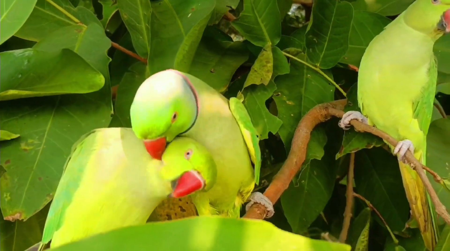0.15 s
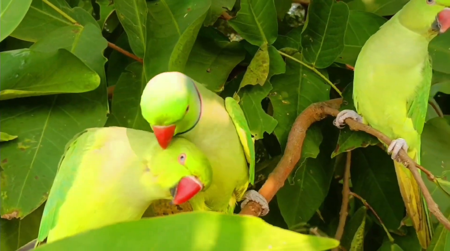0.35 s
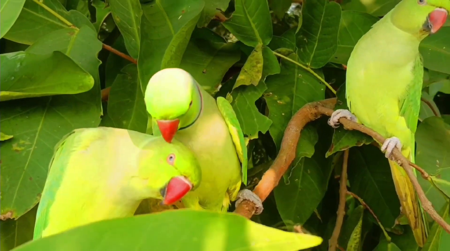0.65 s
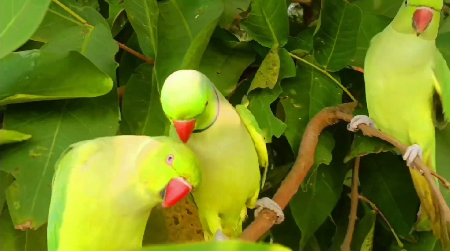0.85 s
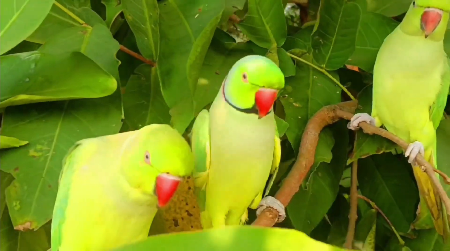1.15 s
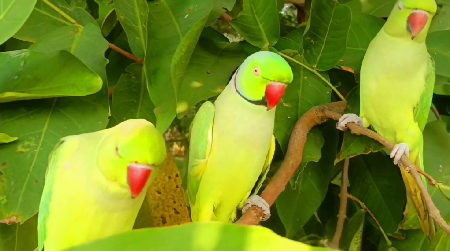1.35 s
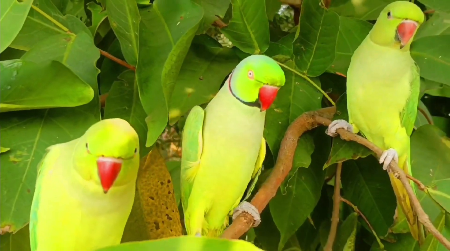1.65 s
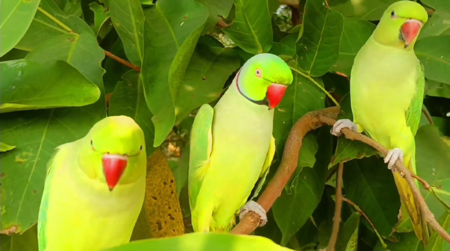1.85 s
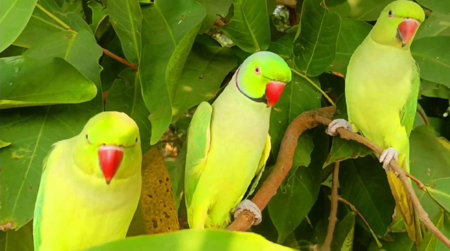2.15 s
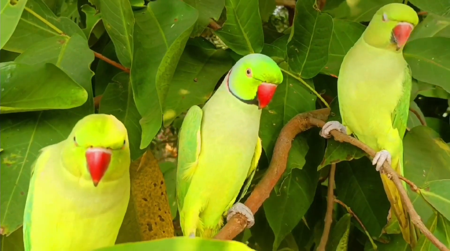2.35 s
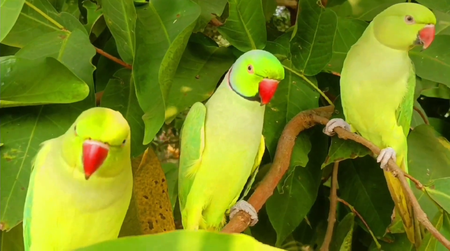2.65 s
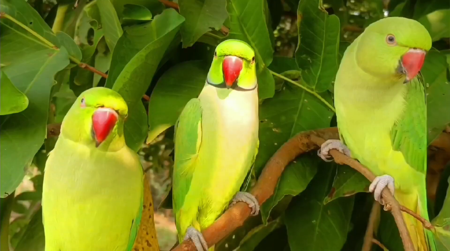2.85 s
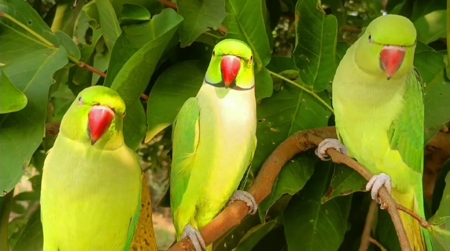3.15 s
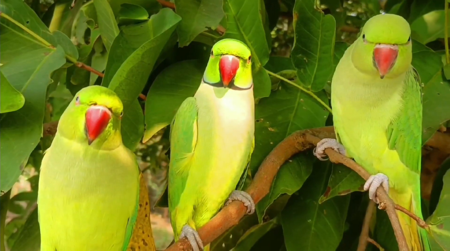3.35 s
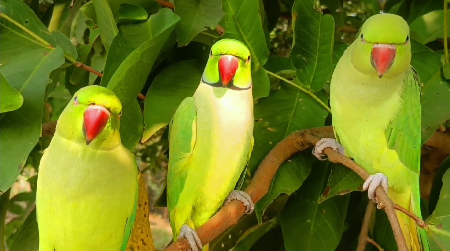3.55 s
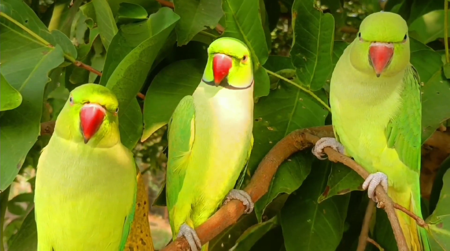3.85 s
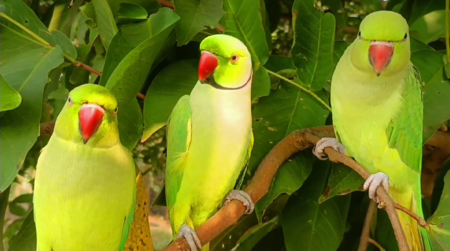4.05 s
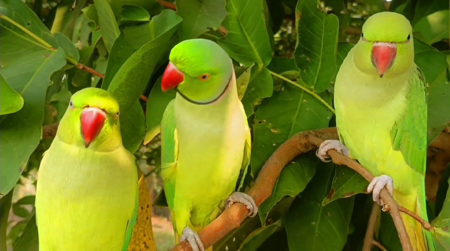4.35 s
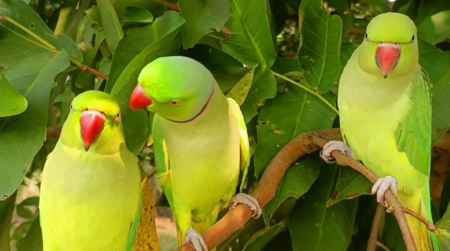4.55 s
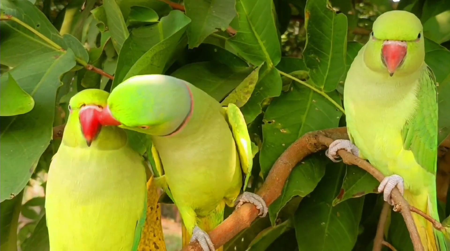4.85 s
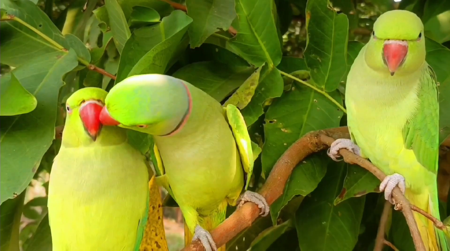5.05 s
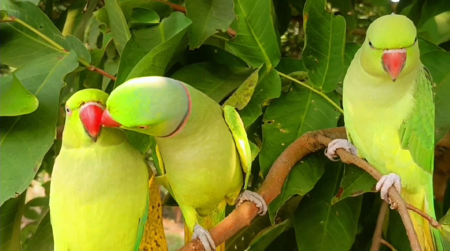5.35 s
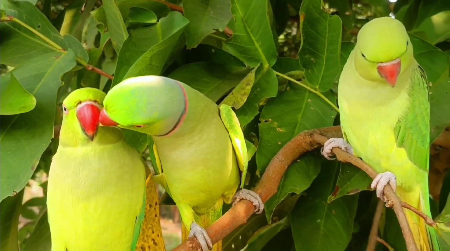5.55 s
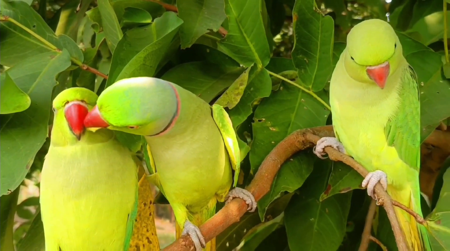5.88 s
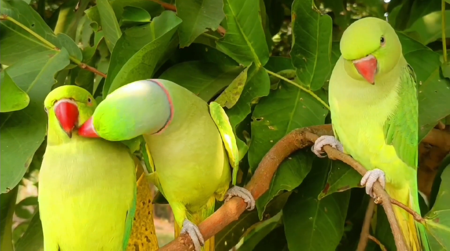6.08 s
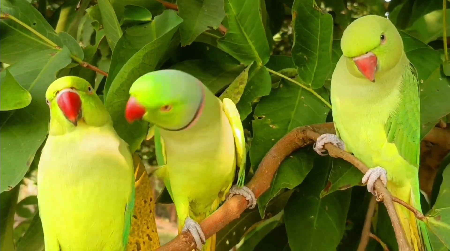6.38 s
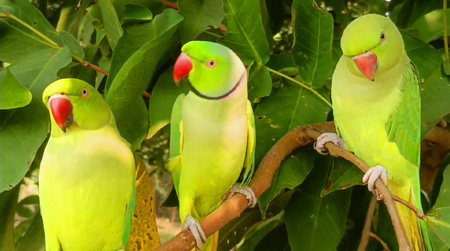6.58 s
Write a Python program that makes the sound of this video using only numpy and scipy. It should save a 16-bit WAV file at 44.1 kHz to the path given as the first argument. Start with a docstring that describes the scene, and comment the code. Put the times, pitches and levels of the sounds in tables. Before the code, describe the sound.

Outdoor foliage, parakeets near the microphone: one raw screech at the very start, small knocks and feather rustle, then a calmer stretch of distant whistled song and faint twitter. Low rumble and soft hiss swell back before a piercing whine strains upward, cracks and drops; after a brief gap and a sharp beak tick, another torn screech bursts out, then air and faint chatter remain.

```python
"""A leafy tree with parakeets: a harsh screech, a long nasal whine that rises, cracks and falls, a second screech.
Each screech is a harmonic down-sweep that breaks into a rasp by phase and amplitude modulation, as the syrinx flutters.
The whine sums a strong second harmonic, filtered overtones and a thin whistle of sum tones.
Feathers (grainy filtered noise) rustle and beaks (decaying noise bands) tick around the calls.
Small birds (gliding sines) sing far off over a low rumble of coloured noise."""
import sys
import numpy as np
from scipy import signal
from scipy.fft import rfft, irfft, next_fast_len
from scipy.io import wavfile
from scipy.ndimage import uniform_filter1d

SR = 44100
rng = np.random.default_rng(int(sys.argv[2]) if len(sys.argv) > 2 else 0)


def dump_mix(stems):
    """Bounce the given channels to the path in sys.argv[1] as a 16-bit WAV at rate SR."""
    frames = np.atleast_2d(stems).T  # one column per channel
    limited = np.clip(frames, -1, 1)  # hard clip at full scale
    pcm = np.round(limited * 32767).astype(np.int16)
    wavfile.write(sys.argv[1], SR, pcm)


N = 296352
TIME = np.arange(N) / SR
TOP_HZ = 15700  # upper limit of the harmonics and of the whole sound

# the voice cracks at the top of the whine: (time [s], length [s], pitch [Hz], level [dB])
CRACK = (5.055, .022, 2200, -16)
# resonances of the throat in a screech: (frequency [Hz], gain [dB])
SCREECH_THROAT = [(500, -19.5), (900, -5.5), (1400, -5), (2100, -3), (3200, -2), (4100, -1.5),
                  (4600, -18.5), (5000, -21.5), (5400, -3), (6100, -14.5), (6550, -4.5), (7600, -5),
                  (8600, -22), (15000, -27)]
# stretches of higher rumble and soft hiss: (start [s], end [s], rumble lift [dB], hiss level [dB])
SWELLS = [(-.1, 1.304, 9, -64), (4.127, 6.8, 9, -61.5)]


def undb(db):
    """Amplitude ratio: decibels to gain."""
    return 10 ** (np.asarray(db) / 20)


def unit(x):
    """Normalisation: scale to rms 1."""
    return x / np.sqrt(np.mean(x ** 2) + 1e-18)


def steady(x, seconds):
    """Envelope division: hold the running rms at 1, leaving faster flutter in."""
    window = max(int(seconds * SR), 8)
    power = np.abs(uniform_filter1d(x ** 2, window))
    return x / np.sqrt(power + 1e-12)


def shape(x, gain):
    """Spectral multiplication: filter by a gain that is a function of frequency."""
    n = next_fast_len(x.shape[-1] + 4096)
    hz = np.maximum(np.arange(n // 2 + 1) * SR / n, 1)
    return irfft(rfft(x, n) * gain(hz), n)[..., :x.shape[-1]]


def colour(x, points):
    """Spectral envelope: filter by (frequency [Hz], gain [dB]) points on a log-frequency axis."""
    hz, db = np.transpose(points)
    return shape(x, lambda f: undb(np.interp(np.log(f), np.log(hz), db)))


def resonance(x, hz, width):
    """Simple resonator: two-pole band-pass, gain 1 at the centre."""
    b, a = signal.iirpeak(min(hz, .45 * SR), hz / width, fs=SR)
    return signal.lfilter(b, a, x)


def wobble(n, hz):
    """Random modulation: low-passed noise up to about hz, rms 1."""
    return unit(shape(rng.standard_normal(n), lambda f: 1 / (1 + (f / hz) ** 4)))


def step(t, at, seconds):
    """Sigmoid transition: smooth rise from 0 to 1 around a moment."""
    return (1 + np.tanh((t - at) / seconds)) / 2


def gate(t, start, end, rise, fall):
    """Amplitude envelope: smooth opening at start and closing at end."""
    return (1 + np.tanh((t - start) / rise)) * (1 + np.tanh((end - t) / fall)) / 4


def registers(x):
    """Band splitting: part a voice at the throat's notch into its body and its shrill edge."""
    body = shape(x, lambda f: 1 / (1 + (f / 4850) ** 40))
    return body, x - body


def span(start, end):
    """Sampled time: clock times from start to end."""
    return TIME[max(int(start * SR), 0):int(end * SR)]


def add(out, t, x):
    """Superposition: mix x into out at its clock times."""
    i = int(round(t[0] * SR))
    out[i:i + len(x)] += x


def background(rumble_hz=230, side_db=-14):
    """Coloured noise: outdoor air with a restless rumble, widened by noise of opposite sign in the two channels."""
    # spectrum of the background: (frequency [Hz], relative level [dB])
    air_spectrum = [(15, -51.5), (25, -31.5), (73, -2.5), (113, -0.5), (221, -12), (741, -16), (1240, -23),
                    (4500, -27), (7500, -36), (8350, -38.5), (9050, -63.5), (10900, -70.5), (11800, -46.5),
                    (13200, -29.5), (15500, -29.5)]
    # low drones in the rumble: (centre [Hz], width [Hz], level [dB])
    drones = [(95.8, 18, -60.5), (127.4, 25, -66.5), (166.4, 41, -67.5)]
    air_db = -55.5
    air, side = (unit(colour(rng.standard_normal(N), air_spectrum)) * undb(air_db) for _ in range(2))
    low = shape(air, lambda f: 1 / (1 + (f / rumble_hz) ** 4))
    drone = np.zeros(N)
    for hz, width, db in drones:
        narrow = resonance(resonance(rng.standard_normal(N), hz, width), hz, width)
        drone += undb(db) * unit(narrow)
    lift = sum(db * gate(TIME, start, end, 0.007, .01) for start, end, db, _ in SWELLS)
    swell = undb(lift + 0.33 * wobble(N, 4.4))
    rumble = (colour(low, [(35, -7), (70, -2.5), (250, 1.5)]) + drone) * swell
    side = undb(side_db) * colour(side, [(40, 6), (100, 0.5), (200, 3), (330, 14), (700, 9.5),
                                         (3000, 13.5), (8000, 9), (13000, 10)])
    return air - low + rumble + np.array([[1], [-1]]) * side


def feathers(grain_db=3):
    """Stick-slip friction: barbs slide in tiny uneven bursts, with a duller scrape. Apart from this, a soft
    hiss rises in two stretches."""
    # spectrum of the rustle, bright from 1 to 8 kHz, almost empty near 10 kHz:
    #   (frequency [Hz], relative level [dB])
    rustle_spectrum = [(530, -49.5), (900, -10), (1490, -11.5), (1700, -14.5), (1780, -15), (3650, -6),
                       (4960, -21.5), (5390, -13.5), (6580, -4), (7760, -4.5), (8630, -28.5), (8940, -50.5),
                       (10500, -80.5), (11400, -26.5), (15000, -28)]
    # rustles: (time [s], length [s], attack [s], level [dB], dull scrape level [dB])
    rustles = [(0.341, 0.091, 0.0037, -50, -48), (0.516, 0.13, 0.064, -44.5, -50),
               (1.228, .08, 0.052, -48.5, -74.5), (4.135, 0.079, 0.0028, -47, -80),
               (4.272, 0.057, 0.022, -48.5, -64), (5.272, 0.074, 0.0045, -55, -63),
               (6.078, 0.14, 0.028, -62, -66)]
    hiss_ramp_s, release_s = .004, 0.024
    scrape_hz, scrape_width_hz = 850, 450
    grains = rng.standard_normal(N) * undb(grain_db * wobble(N, 300))
    bright = unit(colour(grains, rustle_spectrum))
    dull = unit(resonance(resonance(grains, scrape_hz, scrape_width_hz), scrape_hz, scrape_width_hz))
    out = np.zeros(N)
    for start, end, _, db in SWELLS:
        out += bright * undb(db) * gate(TIME, start, end, hiss_ramp_s, hiss_ramp_s)
    for start, length, attack, db, scrape_db in rustles:
        envelope = gate(TIME, start, start + length, attack, release_s)
        out += envelope * (undb(db) * bright + undb(scrape_db) * dull)
    return out


def screech_gesture(u, length, breaks, shrill, level_db, open_hz, opening, rest_hz=2250):
    """Articulation: pitch, body and treble levels, roughness and beak resonance, u seconds into a screech."""
    # swoop down to a shelf, break into a low rasp, lift to a crest, droop while closing
    swoop_hz, shelf_hz, rasp_hz, crest_hz, droop_hz = 3200, 1990, 1018.5, 1359, 200.5
    swoop_share, break_s = .21, .01  # swoop time as a share of the clean part; time the break takes
    crest_s, crest_rise_s, crest_fall_s, close_s = .268, .07, 0.031, 0.051
    accent_db, accent_s, accent_edge_db = 5.5, .007, 4.5  # opening accent; its extra treble
    surge_db, sag_db_per_s, close_db = 2.5, 25.5, -15
    rough_clean, rough_rasp, rough_crest, tear_s = .16, .88, .38, .02
    edge_db, shrill_db, shrill_s = -16.5, 13.5, .035  # treble against the body; its late rise
    flare_hz, flare_width_hz, flare_db, flare_body_db = 6440, 190, 13.5, 1.5

    u = np.maximum(u, 0)
    broken = step(u, breaks, break_s)
    since = np.maximum(u - breaks, 0)
    crest = np.exp(-((u - crest_s) / np.where(u < crest_s, crest_rise_s, crest_fall_s)) ** 2)
    closing = np.clip(1 + (u - length) / close_s, 0, 1)
    high = shelf_hz + (swoop_hz - shelf_hz) * np.exp(-u / (swoop_share * breaks))
    low = rasp_hz + (crest_hz - rasp_hz) * crest - droop_hz * closing
    hz = high + (low - high) * broken
    # the rasp grows after the break and partly clears on the crest
    rough = rough_clean + (rough_rasp - rough_clean) * step(u, breaks + tear_s, tear_s)
    rough -= (rough_rasp - rough_crest) * crest ** 10
    accent = np.exp(-u / accent_s)
    db = level_db + accent_db * accent + surge_db * broken - sag_db_per_s * since + close_db * closing ** 2
    # the call flares as its third harmonic crosses a resonance
    crossing = np.exp(-((3 * hz - flare_hz) / flare_width_hz) ** 2)
    treble_db = db + edge_db + shrill_db * step(u, shrill, shrill_s)
    treble_db += flare_db * crossing + accent_edge_db * accent
    beak_hz = rest_hz + (open_hz - rest_hz) * np.minimum(since / opening, 1) * (1 - closing)
    return hz, db + flare_body_db * crossing, treble_db, np.clip(rough, 0, 1), beak_hz


def screech(start, length, breaks, shrill, level_db, open_hz, opening, beak_db, beak_width_hz, first_db,
            flutter_hz=200, throb=0.12, breath_db=-23, slope_db=-3, clean_db=-6):
    """Source and filter: a harmonic sweep whose flutter in phase and strength smears the upper harmonics."""
    # modulation at full roughness: (phase swing [rad], pitch stagger [share of pitch])
    swing, stagger = (1.25, .055)
    # narrow rings set off by a screech: (centre [Hz], width [Hz], gain [dB])
    rings = [(6270, 110, -1), (12576, 12, 9)]
    t = span(start - .02, start + length + 0.035)
    n = len(t)
    hz, db, edge_db, rough, beak_hz = screech_gesture(
        t - start, length, breaks, shrill, level_db, open_hz, opening)
    swooping = 1 - step(t, start + breaks, .01)
    # the syrinx flaps at an uneven rate far below its pitch, and the pitch itself staggers
    flap = 2 * np.pi * np.cumsum(flutter_hz * (1 + .25 * wobble(n, 50))) / SR
    phase = 2 * np.pi * np.cumsum(hz * (1 + stagger * rough * wobble(n, 60))) / SR
    phase += swing * rough * (.6 * np.sin(flap) + .3 * wobble(n, 260))
    voice = np.zeros(n)
    for k in np.arange(1, 15):
        lift = beak_db / (1 + ((k * hz - beak_hz) / beak_width_hz) ** 2)
        # the opening swoop holds little above the second harmonic; rough stretches lose some fundamental
        tilt = slope_db * np.log2(k) + clean_db * swooping * np.clip(k - 2, 0, 2)
        tilt += (k == 1) * first_db * rough
        # each harmonic tears in its own way
        torn = .5 * rough * (wobble(n, 110) * np.sin(k * phase) + wobble(n, 110) * np.cos(k * phase))
        voice += (k * hz < TOP_HZ) * undb(lift + tilt) * (np.sin(k * phase) + torn)
    voice += undb(breath_db) * (0.13 + rough) * 6 * rng.standard_normal(n)
    voice *= np.exp(throb * rough * np.cos(flap))
    body, edge = registers(colour(voice, SCREECH_THROAT))
    call = steady(body, .008) * undb(db) + steady(edge, .01) * undb(edge_db)
    call *= gate(t, start, start + length, 0.0018, .005)
    ringing = sum(undb(ring_db) * resonance(call, f, width) for f, width, ring_db in rings)
    return t, call + ringing


def grove(x, t60, gap=.006):
    """Multiple scattering: leaves and trunks return a dense tail that dies away exponentially over t60 [s]."""
    t = span(0, 1.2)
    tail = rng.standard_normal(len(t)) * undb(-60 * t / t60) * (t > gap)
    return signal.fftconvolve(x, tail / np.sqrt(np.sum(tail ** 2)))[:N]


def ticks():
    """Impact: each knock is an exponentially decaying noise burst confined to one band."""
    # beak ticks and taps on the perch: (time [s], peak level [dB], centre [Hz], width [Hz], t60 [s])
    knocks = [(.359, -27, 486, 690, 0.011), (.535, -37, 870, 401.7, 0.041), (.577, -41, 785, 500, 0.035),
              (.614, -44, 776, 500, 0.029), (1.524, -43.5, 702, 590, 0.01), (1.536, -34, 626, 690, 0.0044),
              (4.167, -34, 5900, 3000, 0.02), (4.273, -36, 7100, 1210, 0.013),
              (4.274, -34.5, 1540, 1000, .01), (5.492, -37.5, 6730, 2510, 0.037),
              (5.587, -23.5, 2530, 3505, 0.0058)]
    out = np.zeros(N)
    for start, db, hz, width, t60 in knocks:
        t = span(start, start + .1)
        push = rng.standard_normal(len(t)) * undb(-60 * (t - t[0]) / t60)
        edges = np.clip([hz - width / 2, hz + width / 2], 80, .45 * SR)
        band = signal.butter(3, edges, "bandpass", fs=SR, output="sos")
        knock = signal.sosfilt(band, push)
        add(out, t, undb(db) * knock / np.abs(knock).max())
    return out


def twitter(spread=0.2, glide=0.25, chirp_s=.055, quaver=.025, count=32):
    """Superposed frequency glides: short quavering chirps from birds deeper in the trees merge into chatter."""
    # bouts: (time [s], length [s], centre pitch [Hz], rms level [dB])
    bouts = [(1.029, 0.33, 3700, -61), (1.327, 0.31, 3904, -59.5), (1.803, .35, 3840, -63),
             (2.201, .22, 3306, -65), (2.33, .33, 3990, -61), (2.749, 0.96, 3650, -66.5),
             (3.699, 0.37, 2662, -65.5), (6.049, 0.68, 3800, -67)]
    out = np.zeros(N)
    for start, length, centre_hz, db in bouts:
        bout = np.zeros(N)
        shake = 1 + quaver * wobble(int(SR), 150)
        for i, (late, pitch, bend, size) in enumerate(rng.uniform(-0.92, 1, (count, 4))):
            at = start + (i + late / 2) / count * (length - chirp_s)
            t = span(at, at + chirp_s)
            bending = glide * bend * np.linspace(-.5, .5, len(t))
            hz = centre_hz * np.exp(spread * pitch + bending) * shake[(t % 1 * SR).astype(int)]
            chirp = np.hanning(len(t)) * np.sin(2 * np.pi * np.cumsum(hz) / SR)
            add(bout, t, np.exp(size / 2) * chirp)
        out += undb(db) * bout / np.sqrt(np.sum(bout ** 2) / (length * SR))
    return out


def songbird(quaver=.017):
    """Frequency modulation: whistled notes bend through three pitches on a parabola."""
    # song notes: (time [s], length [s], start [Hz], middle [Hz], end [Hz], level [dB])
    song_notes = [(1.466, .09, 3480, 3390, 3480, -60), (1.709, 0.12, 3770, 3600, 3350, -58),
                  (1.807, .073, 4200, 4440, 4420, -59), (1.908, 0.12, 2200, 2320, 2425, -60.5),
                  (1.929, 0.066, 4200, 3980, 3950, -60), (2.131, 0.11, 2930, 3074, 3440, -60.5),
                  (2.559, 0.095, 3850, 4040, 4100, -59), (2.649, 0.12, 2353, 2228, 2160, -51),
                  (2.766, .039, 2450, 2550, 2500, -61), (2.891, 0.11, 2140, 2064, 2044, -50.5),
                  (3.001, .09, 1955, 1646, 1530, -59), (3.077, 0.082, 1540, 1707, 1845, -56.5),
                  (3.203, 0.056, 2210, 1994, 1990, -52), (3.267, 0.096, 2410, 2620, 2700, -56),
                  (3.367, 0.14, 2635, 2275, 2300, -52), (3.645, 0.08, 1755, 2060, 2410, -59),
                  (3.706, 0.17, 2437, 2595, 2457, -55), (3.86, 0.11, 2500, 2398, 2070, -55.5),
                  (4.059, 0.085, 2930, 3010, 2970, -55.5), (4.305, 0.16, 2560, 2240, 2200, -50)]
    # another far bird's thin two-note call: (time [s], level [dB])
    pips = [(1.34, -63.5), (2.83, -62), (6.07, -65.5)]
    pip_hz, pip_arch_hz, pip_s, pip_gap_s = 4870, 221, 0.048, 0.17
    pip_notes = [(at + k * pip_gap_s, pip_s, pip_hz, pip_hz + pip_arch_hz, pip_hz, db)
                 for at, db in pips for k in range(2)]
    out = np.zeros(N)
    for start, length, *pitches, db in song_notes + pip_notes:
        t = span(start, start + length)
        u = np.linspace(0, 1, len(t))
        bend = np.polyval(np.polyfit([0, .5, 1], pitches, 2), u)
        hz = bend * (1 + quaver * wobble(len(t), 110))
        swell = 2.18 * u ** 0.4 * (1 - u) ** .7 * undb(db + 2.0 * wobble(len(t), 50))
        add(out, t, swell * np.sin(2 * np.pi * np.cumsum(hz) / SR))
    return out


def whine_gesture(t):
    """Vocal tension: strain grows with the pitch; after the crack the voice falters, then falls hoarsely."""
    # pitch contour: (time [s], fundamental [Hz])
    pitch_contour = [(4.45, 742), (4.474, 719.2), (4.582, 737.3), (4.8, 816.3), (5.012, 933), (5.064, 1046),
                     (5.102, 928), (5.13, 896), (5.255, 593.7)]
    # levels at the start: fundamental, second harmonic, overtones, treble
    first_start_db, second_start_db, over_start_db, edge_start_db = -23, -13.5, -33, -41.5
    # their change as the pitch climbs
    strain_second_db, strain_over_db, strain_edge_db = -4.5, -9, 13.5
    # their change as the fall turns hoarse, and the fade of the second harmonic after it
    hoarse_s, hoarse_first_db, hoarse_over_db, hoarse_edge_db = 5.128, -4.5, 19.5, 1
    fade_db_per_s = 110
    falter_s, falter_length_s, falter_db = 5.078, 0.023, -5
    rough_clean, rough_cracked = .013, .075

    hz = np.interp(t, *np.transpose(pitch_contour))
    strain = np.maximum.accumulate(np.clip((hz - hz[0]) / (hz.max() - hz[0]), 0, 1))
    press = np.sin(strain * np.pi / 2)
    hoarse = step(t, hoarse_s, .012)
    falter = falter_db * np.exp(-((t - falter_s) / falter_length_s) ** 2)
    fade = fade_db_per_s * np.maximum(t - hoarse_s - .03, 0)
    first_db = first_start_db + hoarse_first_db * hoarse + falter - fade / 2
    second_db = second_start_db + strain_second_db * strain + falter - fade
    over_db = over_start_db + strain_over_db * press + hoarse_over_db * hoarse - fade / 5
    edge_db = edge_start_db + strain_edge_db * press + hoarse_edge_db * hoarse + falter
    rough = rough_clean + (rough_cracked - rough_clean) * step(t, CRACK[0], .02)
    return hz, first_db, second_db, over_db, edge_db, rough


def whine(start=4.447, end=5.259, breath_db=-13, half_db=-24, shimmer_db=0.6, whistle_hz=5530, whistle_db=-5):
    """Additive synthesis: a strong second harmonic, nasal overtones, faint half-harmonics and a thin whistle."""
    # resonances of the throat in the whine: (frequency [Hz], gain [dB])
    whine_throat = [(600, -37.5), (1500, -11), (2200, 4.5), (2700, -12), (3100, -14.5), (3700, -3),
                    (4300, -4), (4950, -26), (5600, -20.5), (6200, -12.5), (6500, 2.5), (6900, -10.5),
                    (7600, -13), (8300, -28), (15000, -30)]
    t = span(4.4, 5.32)
    n = len(t)
    hz, first_db, second_db, over_db, edge_db, rough = whine_gesture(t)
    smooth_hz = uniform_filter1d(hz, size=700)  # rounds the corners of the contour
    phase = 2 * np.pi * np.cumsum(smooth_hz) / SR + rough * wobble(n, 430)
    low = np.sqrt(2) * (undb(first_db) * np.sin(phase) + undb(second_db) * np.sin(2 * phase))
    low += undb(second_db - 34) * np.sin(1.5 * phase + .6 * wobble(n, 60))
    upper = np.zeros(n)
    for k in np.arange(3, 20):
        strength = (k * hz < TOP_HZ) * undb((3 + 25 * rough) * wobble(n, 14))
        upper += strength * (np.sin(k * phase) + undb(half_db) * np.sin((k - .5) * phase))
    hiss = undb(breath_db) * (0.4 + 16 * rough) * rng.standard_normal(n)
    body, edge = registers(colour(upper + hiss, whine_throat))
    # a second, high vibration is modulated by the voice; only its sum tones sound, weakened above 7.7 kHz
    carrier = 2 * np.pi * whistle_hz * t + 0.28 * wobble(n, 100)
    sum_tones = np.sin(carrier + 2 * phase) + np.sin(carrier + 3 * phase)
    edge = edge + undb(whistle_db) * colour(sum_tones, [(7700, 0), (8100, -25)])
    call = low + steady(body, 0.026) * undb(over_db)
    call += steady(edge, 0.018) * undb(edge_db + 0.99 * wobble(n, 50))
    call *= undb(shimmer_db * wobble(n, 51)) * gate(t, start, end, 0.0033, 0.0093)
    # for an instant the vibration turns chaotic
    at, length, crack_hz, crack_db = CRACK
    broken = gate(t, at - length / 2, at + length / 2, .003, .003)
    rasp = np.sin(2 * np.pi * crack_hz * t + 1.1 * wobble(n, 330)) * np.exp(.3 * wobble(n, 700))
    rasp += .14 * unit(colour(rng.standard_normal(n), SCREECH_THROAT))
    return t, call * (1 - broken / 2) + undb(crack_db) * broken * unit(rasp)


def scene():
    """Direct-to-scattered ratio: near parakeets carry a little scatter, far birds much more."""
    # screeches: (start [s], length [s], breaks after [s], turns shrill after [s], base level [dB],
    #   open-beak resonance [Hz], time to open [s], beak lift [dB], beak width [Hz],
    #   change of the fundamental at full roughness [dB])
    screeches = [(.005, .34, .068, .175, -18, 2600, .15, 11, 560, -8),
                 (5.592, 0.34, .077, 0.23, -18, 3200, .05, 10, 280, -5.5)]
    calls = np.zeros(N)
    for row in screeches:
        add(calls, *screech(*row))
    add(calls, *whine())
    # the small leaves throw back mostly the treble
    scattered = colour(calls, [(700, -8.0), (1500, -5.5), (3000, -2.0), (7000, 1.0)])
    near = calls + undb(-10) * grove(scattered, t60=.16) + undb(-24.5) * grove(scattered, t60=.6)
    song = songbird()
    far = undb(-.5) * song + undb(-4.5) * grove(song, t60=.7) + grove(twitter(), t60=.45)
    return near + far + feathers() + ticks() + background()


def record(dry):
    """Saturation and band-limiting: peaks are rounded, the treble is thin between 9 and 11 kHz, the top is cut."""
    # overall tone colour: (frequency [Hz], gain [dB])
    tone_colour = [(20, -0.5), (7800, 0.5), (8500, -3.5), (9000, -17.5), (11200, -20), (11900, 5),
                   (16000, -8)]
    rounded = dry / (1 + (dry / .52) ** 10) ** (1 / 10)
    steep_cut = signal.ellip(10, .2, 70, TOP_HZ, fs=SR, output="sos")
    return signal.sosfilt(steep_cut, colour(rounded, tone_colour))


dry = scene()
out = record(dry)
dump_mix(out)
```